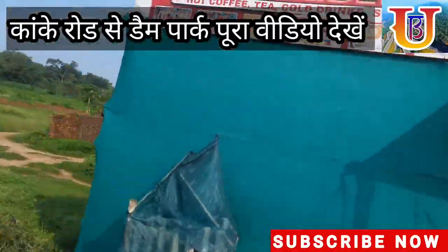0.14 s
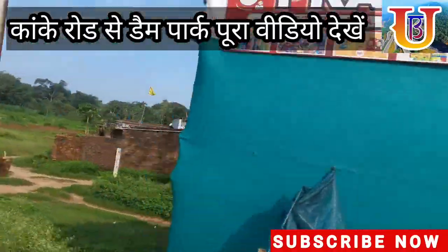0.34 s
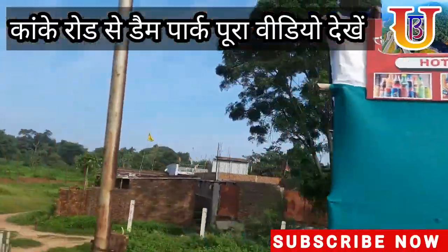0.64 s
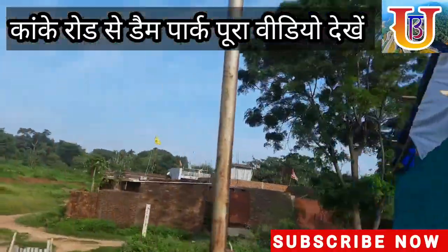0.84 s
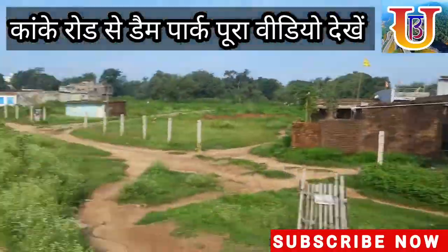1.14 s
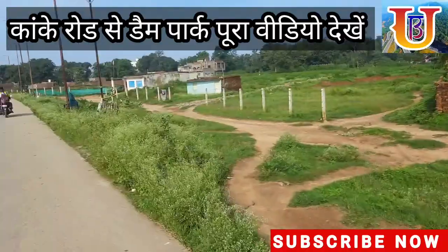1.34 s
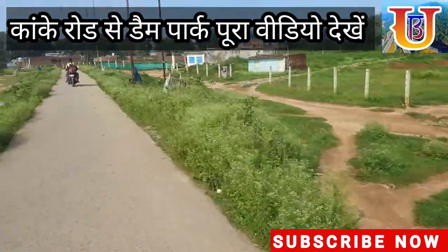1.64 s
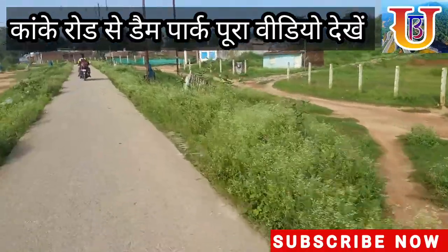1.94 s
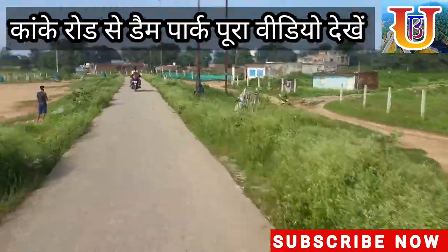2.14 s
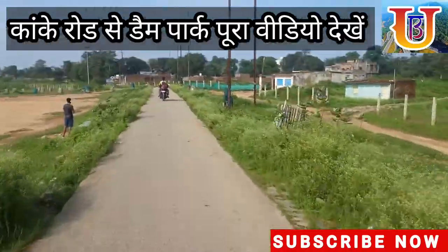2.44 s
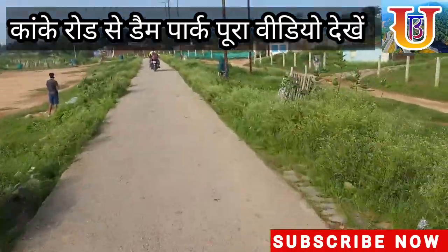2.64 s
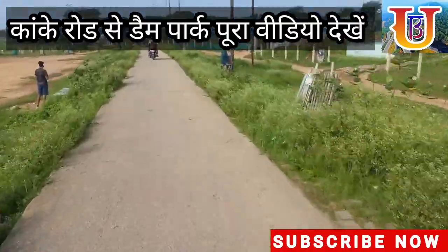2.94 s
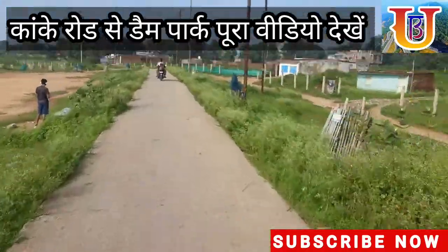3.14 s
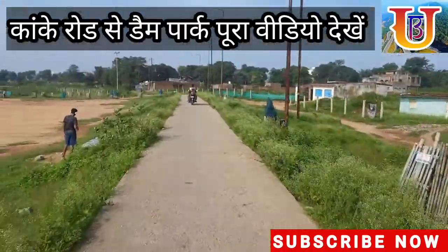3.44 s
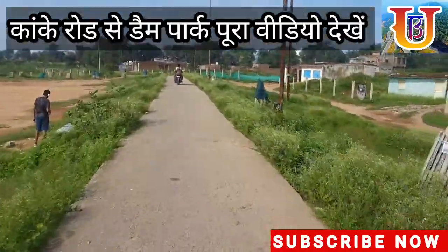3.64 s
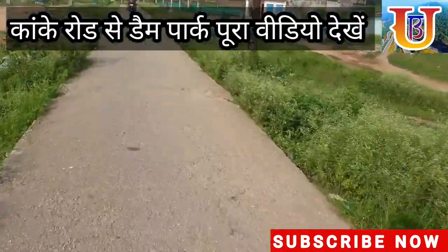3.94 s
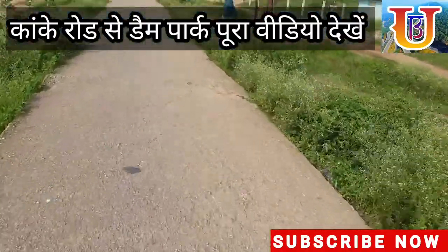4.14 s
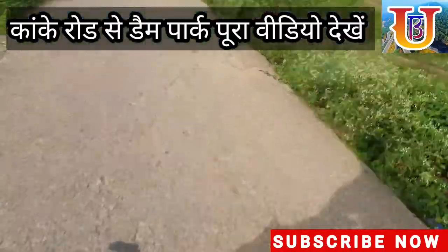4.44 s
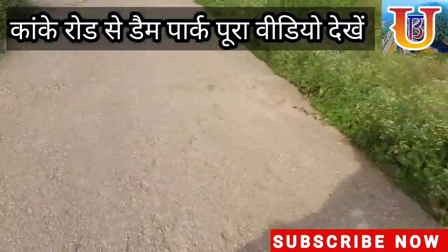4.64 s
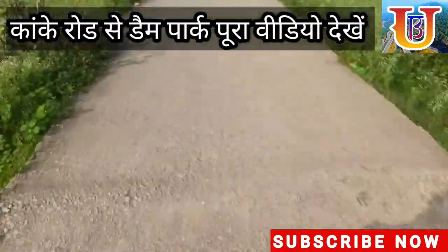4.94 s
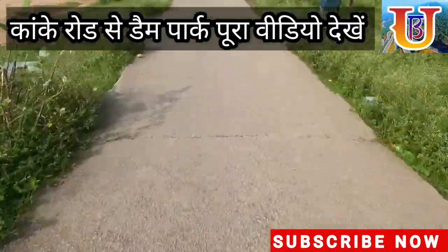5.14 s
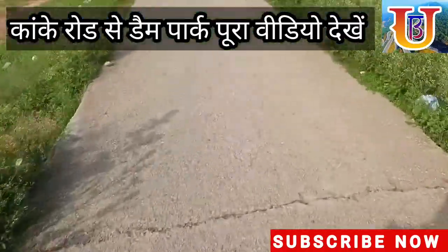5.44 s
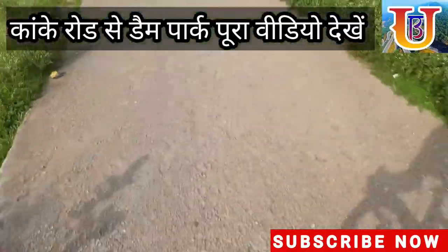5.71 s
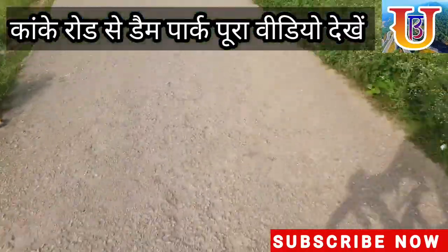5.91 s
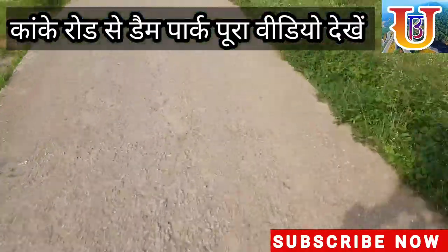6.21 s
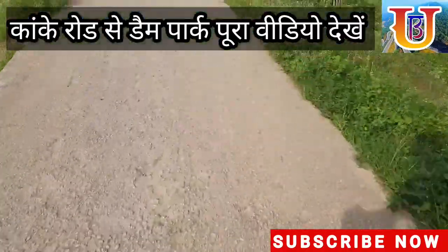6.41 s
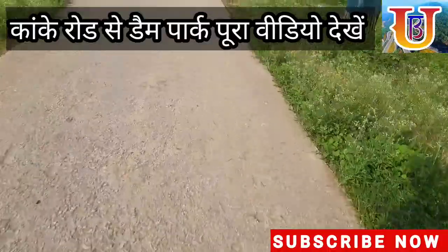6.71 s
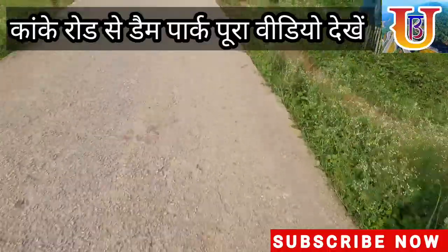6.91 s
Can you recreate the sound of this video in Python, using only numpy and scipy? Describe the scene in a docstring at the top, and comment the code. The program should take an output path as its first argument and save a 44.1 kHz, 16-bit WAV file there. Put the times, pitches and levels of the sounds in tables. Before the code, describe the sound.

A moving bicycle outdoors: fluttering wind bursts, grainy tyre rumble, increasingly busy rattles, tiny metallic pings, and a brief insect trill near the start.

```python
"""Wind buffets the microphones from the start, over droning, hissing tyres and the rattle of loose parts.
The place is a paved path; a phone rides on a bicycle and records through two microphone ports.
Wind, tyres and rattles are shaped noise; eddies and thumps are short decaying swings of air pressure.
An insect in the verge trills early on in swept chirps, a small steel part pings as a set of decaying
sines, and joints in the paving jolt the frame into bursts of noise."""
import sys
import numpy as np
from scipy import signal
from scipy.fft import rfft, irfft, next_fast_len
from scipy.io import wavfile
from scipy.ndimage import uniform_filter1d, map_coordinates

SR = 44100
rng = np.random.default_rng(int(sys.argv[2]) if len(sys.argv) > 2 else 0)


def dump(signal):
    """Clip the signal to [-1, 1] and save it as 16-bit WAV at the path in sys.argv[1]."""
    limited = np.clip(np.atleast_2d(signal).T, -1, 1)
    pcm = np.round(limited * 32767).astype(np.int16)
    wavfile.write(sys.argv[1], SR, pcm)


N = 311787


def amp(db):
    """Amplitude factor of a level in dB."""
    return 10 ** (np.asarray(db) / 20)


def unit(x):
    """x scaled to an RMS of one over both ports."""
    return x / np.sqrt(np.mean(x ** 2) + 1e-20)


def curves(rows):
    """One value per sample, by straight lines, for each column after the time."""
    time_s, *columns = np.transpose(rows)
    return [np.interp(np.arange(N) / SR, time_s, column) for column in columns]


def wobble(knots_per_s):
    """Two smooth random curves through random knots."""
    at = np.arange(N) * knots_per_s / SR
    return np.array([map_coordinates(knots, [at]) for knots in rng.standard_normal((2, 4000))])


def filtered(x, response):
    """x passed through a complex response of frequency."""
    size = next_fast_len(N + SR // 2)  # room for the filter to ring out
    return irfft(rfft(x, size) * response(np.fft.rfftfreq(size, 1 / SR)), size)[..., :N]


def colour(points):
    """Gain curve through (hz, db) points on a log frequency axis."""
    point_hz, db = np.transpose(points)
    return lambda hz: amp(np.interp(np.log(hz + 1), np.log(point_hz + 1), db))


def resonances(modes):
    """Causal sum of (hz, width_hz, gain_db) resonances with alternating signs."""
    def response(f):
        total = 0
        for k, (hz, width_hz, gain_db) in enumerate(modes):
            damping = 1j * f * width_hz
            total = total + (-1) ** k * amp(gain_db) * damping / (hz * hz - f * f + damping)
        return total
    return response


def pair(alike):
    """White noise for two ports, correlated by alike (0 to 1)."""
    a, b = rng.standard_normal((2, N))
    turn = np.arccos(np.clip(alike, 0, 1)) / 2
    return np.cos(turn) * a + np.sin(turn) * np.array([b, -b])


def sides(pan_db):
    """Left and right gains for a left-minus-right level."""
    return amp(np.array([pan_db, -pan_db]) / 2)


def patchy(x, depth_db):
    """Sound with a random gain in patches of frequency and time."""
    z = signal.stft(x, nperseg=1024)[2]
    field = uniform_filter1d(rng.standard_normal(z.shape), size=4, axis=1)
    field = uniform_filter1d(field, size=2, axis=2)
    return signal.istft(z * amp(depth_db * unit(field)), nperseg=1024)[1][:, :N]


def slide(x, pitch, centre_hz):
    """Shifts the whole spectrum so that centre_hz follows the (time_s, centre_hz) curve."""
    turn = 2 * np.pi * np.cumsum(curves(pitch)[0] - centre_hz) / SR
    return np.real(signal.hilbert(x, next_fast_len(N))[:, :N] * np.exp(1j * turn))


# wind on the ports: time_s, flutter_db, rumble_db, pan_db (left minus right)
WIND = [(0.0, -50, -48, 1), (0.27, -51.5, -39, -0.5), (0.35, -35, -43, -8), (0.39, -33, -42, -2),
        (0.53, -34.5, -42, 1), (0.71, -45, -42, 1.5), (0.79, -37, -35.5, 2), (0.85, -33, -37, 4),
        (0.89, -42, -37, -3), (0.94, -32.5, -38, 9), (0.965, -25.5, -32, 6), (0.99, -42, -43, -6),
        (1.01, -32, -32, -5), (1.04, -37, -23, 6), (1.06, -43, -34, 0), (1.09, -40, -41, -7),
        (1.12, -49, -46, 0.0), (1.25, -49, -44, -1), (1.3, -35.5, -36, 1), (1.35, -44, -41, 2),
        (1.42, -34, -35, 3.5), (1.46, -35.5, -41, 7), (1.5, -31, -37, -4), (1.54, -37.5, -34, -1),
        (1.65, -38, -43, 1), (1.74, -38.5, -41, 0.5), (1.78, -56, -40, -5), (1.85, -53, -45.5, -6),
        (1.99, -35.5, -41, 2), (2.13, -45.5, -45, 4), (2.22, -42.5, -49, -1), (2.28, -31, -26, -1.5),
        (2.32, -35, -43, 3), (2.36, -25.5, -36, 0), (2.44, -34, -36, 9), (2.46, -42, -47.5, 0),
        (2.64, -43, -42.5, -3), (2.85, -32.5, -36.5, 3), (2.87, -51, -38, -8), (2.94, -31, -47, 1),
        (2.965, -34.5, -38, 2), (2.995, -26.5, -36, 2), (3.03, -37, -48, -2), (3.06, -36, -34, 2),
        (3.11, -37.5, -37, 1), (3.145, -31.5, -38, -1), (3.19, -22.5, -35, 1), (3.22, -29.5, -25, -2),
        (3.25, -29, -32, 1), (3.275, -28, -32, 3), (3.3, -29.5, -50, 10), (3.33, -45, -40, -9),
        (3.38, -45.5, -43, 0), (3.425, -40, -46, -3), (3.475, -56, -52, 0), (3.525, -41, -37, 1),
        (3.565, -51, -51, 0), (3.605, -36, -40, 1), (3.64, -43.5, -38, -4), (3.73, -36, -44, 2),
        (3.775, -46, -43, -2), (3.825, -37.5, -38, 3), (3.86, -44, -42, 0), (3.9, -36.5, -39, -1),
        (3.98, -34.5, -40, 3), (4.08, -26, -32, -1), (4.11, -36.5, -51, -4.5), (4.25, -38, -39, 5.5),
        (4.31, -51, -53, 1), (4.37, -40.5, -42, -5), (4.47, -42.5, -47, 0), (4.5, -36.5, -40, -1),
        (4.55, -44.5, -44, 2), (4.69, -56, -51, -4), (4.77, -60, -48, 5), (5.05, -52.5, -47, -1),
        (5.16, -44.5, -43, -4), (5.18, -36, -41, -4), (5.22, -60, -48, -18), (5.26, -40, -50, 2),
        (5.3, -37, -38, -1), (5.49, -40.5, -46.5, 4), (5.61, -42.5, -33.5, -7), (5.65, -40, -58, -6),
        (5.71, -44.5, -41.5, 5.5), (6.04, -41, -44, -1), (6.06, -48, -40.5, -4), (6.22, -46, -56, 10),
        (6.28, -43, -40.5, -4), (6.42, -38.5, -43, 6), (6.46, -37.5, -41, 3), (7.07, -42.5, -41.5, 4)]
# noise colour of the low rumble and of the faster flutter: pitch_hz, gain_db (per Hz)
RUMBLE = [(12, -61), (20, -10), (75, 3.5), (119, 4), (184, -5), (260, -9), (340, -37), (570, -120)]
FLUTTER = [(76, -44), (130, -8), (341, -1.5), (386, -3.5), (437, -4), (758, -18), (858, -20.5),
           (2450, -46.5), (3500, -63), (4550, -78), (7700, -120)]
# treble gain of the flutter when it is at TREBLE_REFERENCE_DB: time_s, gain_db
TREBLE = [(0, -7.5), (1, 7), (1.8, 10.5), (2.4, -19), (3.2, 4.5), (4, 0.5), (4.6, -2.5), (5.4, -7),
          (6.2, -4), (7.07, -15)]
TREBLE_REFERENCE_DB, TREBLE_SLOPE = -18.5, -0.2  # slope: treble dB per dB of flutter
PUFFS_DB, PUFFS_PER_S = 2, 11  # quick puffs inside a gust
SIDESTEP_DB = 2  # how far the rumble wanders at each port


def wind():
    """Turbulence tears past each port on its own: lumpy rumble and faster flutter, duller when strong."""
    flutter_db, rumble_db, pan_db = curves(WIND)
    rumble_swell_db = SIDESTEP_DB * wobble(12) + 1.53 * wobble(22) + 3.25 * wobble(60)
    rumble = unit(filtered(amp(rumble_swell_db) * pair(0), colour(RUMBLE)))

    lumps = amp(8.1 * np.tanh(0.58 * wobble(60) + 0.34 * wobble(170)))  # swells of limited size
    puffs = amp(PUFFS_DB * np.tanh(wobble(PUFFS_PER_S)))
    air = lumps * puffs * patchy(pair(0), depth_db=2.5)
    body = filtered(air, colour(FLUTTER))
    treble = filtered(air, lambda hz: colour(FLUTTER)(hz) * hz ** 2 / (hz ** 2 + 700 ** 2))
    treble_db = curves(TREBLE)[0] + TREBLE_SLOPE * (flutter_db - TREBLE_REFERENCE_DB)
    flutter = (body + (amp(treble_db) - 1) * treble) / np.std(body)
    return sides(pan_db) * (amp(rumble_db) * rumble + amp(flutter_db) * flutter)


# the ride, for tyres and loose parts: time_s, hiss_db, roar_db, drone_db (tyres),
# dull_db, bright_db, thin_db (rattle)
RIDE = [(0.0, -53.5, -49, -50.5, -60, -66, -81), (0.37, -53, -53, -51, -64, -66, -72),
        (0.47, -49, -64, -48.5, -56.5, -58.5, -56), (0.61, -50, -50, -42.5, -57.5, -61, -59),
        (0.83, -49.5, -58, -61, -55.5, -58, -56), (1.16, -54, -52.5, -45, -56, -67.5, -67.5),
        (1.59, -52.5, -67, -71, -57.5, -58.5, -62), (1.79, -58, -60, -73, -82, -75, -83),
        (1.93, -57, -51.5, -61, -49.5, -49, -57), (2.01, -57, -53, -77, -70, -59.5, -66),
        (2.22, -53.5, -49, -50, -51, -58, -60), (2.56, -55.5, -58.5, -59.5, -62, -65, -71),
        (3.05, -52.5, -56, -54, -56, -59.5, -62.5), (3.68, -57, -57, -67, -65, -72, -83),
        (4.02, -48, -55, -46, -54.5, -54.5, -58), (4.35, -51, -55.5, -53, -64, -61, -64),
        (4.86, -50.5, -54.5, -50, -60, -58, -66), (4.94, -49, -57, -47.5, -57.5, -58, -66),
        (5.3, -49.5, -59, -51, -52.5, -56, -66), (5.5, -46.5, -56.5, -50.5, -52, -72, -70),
        (5.62, -50.5, -54.5, -48, -60.5, -64, -70), (5.81, -50.5, -59.5, -58, -65, -67, -70),
        (5.83, -49, -71, -51, -52.5, -58, -61), (6.03, -49, -68, -50, -55.5, -60.5, -64),
        (6.15, -47, -64, -48, -52.5, -57, -60), (6.3, -52, -61, -49, -52.5, -56.5, -65),
        (6.5, -48, -64, -55.5, -54, -59, -64), (6.77, -52, -65, -51, -51, -54, -62),
        (7.07, -54, -63, -53.5, -67, -68, -69)]
# noise colours of the tyres: pitch_hz, gain_db (per Hz)
DRONE = [(120, -120), (300, -2.5), (420, -6), (680, -0.5), (800, -14.5), (1000, -18.5), (2000, -120)]
ROAR = [(200, -120), (600, -19.5), (950, -2.5), (1150, -1.5), (1350, -2.5), (1700, -17.5), (2300, -15),
        (4000, -50), (7000, -120)]
HISS = [(1000, -4.5), (1600, -3.5), (2100, -1), (2600, -4), (3700, -6), (5000, -6.5), (6200, -7.5),
        (7700, -8.5), (8600, -14.5), (11200, -19), (15300, -15), (15900, -30), (16500, -50)]
# the roar slides in pitch: time_s, centre_hz
ROAR_PITCH = [(0, 1104), (1.199, 1133), (1.8, 961.5), (2.4, 1047), (3.4, 1142), (4.6, 1304), (5.299, 1261),
              (7.07, 1205)]
ROAR_CENTRE_HZ = 1150  # before the slide


def tyres():
    """Tread on rough paving: a drone, a roar above it and a grainy hiss."""
    hiss_db, roar_db, drone_db = curves(RIDE)[:3]
    drone_swell = amp(4.6 * np.tanh(wobble(40)[0]))
    drone = unit(drone_swell * filtered(pair(0.92), colour(DRONE)))
    roar_swell = amp(4.8 * np.tanh(wobble(45)[0]))
    roar = unit(roar_swell * filtered(pair(1.0), colour(ROAR)))
    roar = slide(roar, ROAR_PITCH, ROAR_CENTRE_HZ)
    grain = amp(0.34 * wobble(5.8)[0] + 1.1 * wobble(60)[0] + 2.15 * wobble(250)[0])
    hiss = unit(grain * filtered(patchy(pair(0.029), depth_db=4.0), colour(HISS)))
    return amp(hiss_db) * hiss + amp(drone_db) * drone + amp(roar_db) * roar


# resonances of the rattling parts: pitch_hz, width_hz, gain_db
DULL = [(1430, 1100, 6), (1795, 138, 28), (2870, 440, -5), (2373, 213, 14.5)]
CLINK = [(3250, 790, 0), (4310, 250, 7), (6840, 520, 6)]
BRIGHT = [(4885, 520, 4.5), (5230, 690, 2.5), (7200, 1300, -9.5)]
THIN = [(9900, 2300, -19), (13500, 1900, -15), (15320, 310, -2.5)]
# the clearest rattles: time_s, level_db, then dull_db, bright_db, thin_db (relative to level_db)
KNOCKS = [(0.011, -30, -4, -8, -9), (0.024, -34, -5, -6, -24), (0.145, -33.5, -6, -7, -10),
          (0.186, -33, -6, -7, -14), (0.2568, -27, -8, -8.5, -15), (0.432, -48, -9, -17, -22),
          (0.4485, -39, -10, -18, -17), (0.46, -27.5, -5, -7.5, -14), (0.486, -29, 0, -17, -18),
          (0.514, -26.5, -16, -6, -13), (0.536, -30, -16, -8, -6), (0.563, -29, -29, -2, -13),
          (0.596, -40, -10, -14, -16), (0.672, -34, -21, -2, -11), (0.694, -35, -17, -8, -4),
          (0.745, -39, -16, -18, -3), (0.7834, -23.5, -7, -5, -11), (0.806, -33, -14, -4, -6),
          (0.8305, -23, -10, -5.5, -13), (1.0916, -25, -2, -9, -14), (1.302, -32, -8, -6.5, -22),
          (1.368, -33, 5, -22, -26), (1.4078, -26, 2, -12, -20), (1.435, -33, -14, -7.5, -8),
          (1.513, -34, 1, -11, -20), (1.606, -38, -12, -4, -18), (1.852, -36, -18, -6, -12),
          (1.886, -31, -7, -2, -14), (1.914, -32, -3, -17, -22), (1.929, -27, -6.5, -14, -19),
          (1.957, -28, -9, -15, -23), (2.026, -33, -8, -7, -20), (2.104, -31.5, -5, -4, -20),
          (2.147, -31.5, -2, -10, -17), (2.169, -34, -6, -6, -16), (2.214, -32, -4, -5, -22),
          (2.262, -34, -8, -6, -20), (2.288, -52, -11, -15, -24), (2.3126, -34, -1, -32, -31),
          (2.3525, -29, -4, -12, -30), (2.4144, -36, -14, -11, -28), (2.518, -43, -4, -14, -26),
          (2.615, -31.5, 3.5, -12, -26), (2.6652, -27.5, -9, -7.5, -18), (2.712, -45, -13, -12, -26),
          (2.796, -34, -10, -6, -12), (2.853, -40, -8, -12, -18), (2.889, -32, -1, -11, -22),
          (2.994, -32, -11, -6, -25), (3.019, -31.5, -5, -3, -20), (3.104, -27, -7, -11, -20),
          (3.139, -50, -11, -16, -26), (3.225, -31, -15, -4, -11), (3.338, -32, 0, -11, -29),
          (3.455, -42, 3, -18, -22), (3.518, -41, 1, -23, -16), (3.537, -38, 0, -20, -28),
          (3.568, -38, 0, -20, -28), (3.743, -28, 1, -10.5, -18), (3.93, -40, -8, -6, -23),
          (3.985, -31, -28, 0, -9), (4.101, -34, -14, -8, -24), (4.121, -32, -23, -4, -31),
          (4.165, -34, -14, -2, -22), (4.189, -32, -16, 1, -22), (4.282, -30, -8, -10, -6),
          (4.3281, -31, -24, -2.5, -9), (4.39, -46, -17, -9, -22), (4.4746, -24, -13, -5, -9),
          (4.535, -35, -3, -7, -31), (4.593, -36.5, -1, -14, -26), (4.65, -46, -20, -5, -22),
          (4.715, -41, -12, -4, -22), (4.731, -32, 0, -16, -24), (4.7722, -22, -10, -11, -20),
          (4.794, -44, -11, -9, -22), (4.825, -38, 0, -17, -24), (4.879, -35, -16, -3, -22),
          (4.926, -33, -4, -18, -15), (4.952, -29, -32, -2, -27), (4.9976, -21, -3, -2, -29),
          (5.104, -28, -20, -4.5, -17), (5.159, -40, -23, -1, -25), (5.183, -29.5, -20, -8, -29),
          (5.2078, -28, -13, -3, -10), (5.252, -23.5, -3.5, -10, -13), (5.2828, -24, -2.5, -8.5, -30),
          (5.3283, -38, -3, -18, -28), (5.351, -48, -9, -18, -28), (5.368, -40, -2, -14, -28),
          (5.4, -34, -2, -16, -28), (5.443, -38, -1, -19, -28), (5.46, -34, 0, -18, -28),
          (5.476, -27, 0, -9, -13), (5.493, -31, -3, -7, -20), (5.505, -30, 2, -12, -24),
          (5.517, -28, 0.5, -10, -24), (5.55, -32, 0, -18, -28), (5.567, -38, -3, -6, -24),
          (5.603, -41, -2, -17, -26), (5.684, -25, -4, -10.5, -18), (5.71, -33, -1, -8, -24),
          (5.8346, -41, -8, -19, -24), (5.848, -28, -12, -3, -22), (5.886, -27, -5, -8, -25),
          (5.909, -23, -4, -8.5, -21), (5.94, -35, -1, -12, -26), (5.9694, -27, -7, -13, -28),
          (6.0612, -20.5, -2.5, -10, -35), (6.097, -31, 2, -8, -26), (6.139, -33, -14, -6, -20),
          (6.165, -43, -6, -12, -26), (6.2071, -25.5, 1, -8, -22), (6.2353, -22.5, -17, -8, -12),
          (6.258, -34, -16, 0, -22), (6.3026, -38, 1, -22, -23), (6.3472, -29, -2.5, -10, -29),
          (6.361, -29, 4, -8, -26), (6.38, -33, 1, -16, -26), (6.404, -27, 1, -29, -33),
          (6.4404, -31, -20, -6, -15), (6.494, -33, 0.5, -0.5, -27), (6.506, -31, -4, -2, -24),
          (6.535, -31, -14, -6, -22), (6.558, -44, -9, -11, -23), (6.596, -29, -1, -17, -25),
          (6.613, -31, -1, -9, -24), (6.6386, -31, 2, -27, -35), (6.6712, -54, -12, -21, -25),
          (6.703, -36, -9, -20, -28), (6.769, -40, -6, -14, -26), (6.793, -30, -14, -19, -8),
          (6.819, -35, -12, -7, -22), (6.899, -28, -5, -7, -33), (6.9863, -30.5, -9, -8.5, -16)]
# the dull rattle slides in pitch: time_s, centre_hz
DULL_PITCH = [(0, 1900), (1.2, 1850), (2.199, 1900), (3.599, 1880), (4.601, 1820), (5.302, 1790),
              (7.07, 1790)]
DULL_CENTRE_HZ = 1800  # before the slide
CLUMP_DB, CLUMPS_PER_S = 1.0, 40  # the chatter comes in clumps
CHATTER_CLINK_DB = -7.5  # clink over the bright rattle
KNOCK_CLINK_DB, KNOCK_SCATTER_DB = -2.5, 3.5  # clink over a knock's bright part, and its scatter
STRIKE_DB = -11  # the sharp blow that opens each contact, over its puff of noise


def rattle():
    """Loose parts chatter: each contact, a blow and a puff of noise a few ms long, excites resonances."""
    at = rng.integers(0, N, 2000)  # contacts at random samples
    # each contact favours its own parts
    size_db = rng.uniform(0, 6.3, (len(at), 1)) + rng.uniform(0, 5.7, (len(at), 4))
    size_db = size_db + CLUMP_DB * wobble(CLUMPS_PER_S)[0][at, None]
    dull_db, bright_db, thin_db = curves(RIDE)[3:]
    chatter_dbs = (dull_db, bright_db + CHATTER_CLINK_DB, bright_db, thin_db)

    time_s, level_db, dull, bright, thin = np.transpose(KNOCKS)
    knock_at = np.round(time_s * SR).astype(int)
    clink = bright + KNOCK_CLINK_DB + KNOCK_SCATTER_DB * rng.standard_normal(len(knock_at))
    knock_dbs = (level_db + dull, level_db + clink, level_db + bright, level_db + thin)

    t60s, alikes = (0.014, 0.014, 0.016, 0.015), (0.95, 0.2, 0.28, 0.14)  # seconds; port likeness
    t = np.arange(SR // 10) / SR
    parts = []
    for k, modes in enumerate((DULL, CLINK, BRIGHT, THIN)):
        puff = amp(-60 * t / t60s[k]) * (1 - np.exp(-t / 0.0012))
        puff_size = np.linalg.norm(puff)
        noise = patchy(pair(alikes[k]), depth_db=1.5)
        scale = np.std(filtered(noise, resonances(modes)))
        chatter = np.bincount(at, amp(size_db[:, k]), N)
        chatter = chatter / np.std(chatter) / puff_size
        blows = amp(chatter_dbs[k]) * chatter + np.bincount(knock_at, amp(knock_dbs[k]), N)
        puffs = signal.fftconvolve(blows, puff)[:N] * noise
        drive = puffs + amp(STRIKE_DB) * puff_size * blows
        parts.append(filtered(drive, resonances(modes)) / scale)
    return slide(parts[0], DULL_PITCH, DULL_CENTRE_HZ) + sum(parts[1:])


# insect phrases, before each stroke's own sweep and unevenness:
# start_s, end_s, first_hz, last_hz, level_db
TRILL = [(0.231, 0.335, 6200, 6330, -55), (0.39, 0.475, 6300, 6450, -60), (0.547, 0.673, 6160, 6660, -57),
         (0.738, 0.797, 6400, 6600, -65), (0.82, 0.92, 5850, 6000, -52), (0.95, 1.08, 5830, 6300, -51.5),
         (1.106, 1.23, 5950, 6240, -50.5), (1.243, 1.359, 6000, 6240, -51)]


def insect():
    """In the verge, a little to the right: each phrase is a train of upward chirps that swells and climbs."""
    out, t = np.zeros(N), np.arange(N) / SR
    # no two strokes are alike
    drift_hz, uneven_db = [[60], [3.5]] * wobble(70) + [[40], [1.3]] * wobble(21)
    slip = 0.2 * wobble(25.0)[0]  # strokes ahead of or behind the beat
    for start_s, end_s, first_hz, last_hz, level_db in TRILL:
        progress = np.clip((t - start_s) / (end_s - start_s), 0, 1)
        stroke = ((t - start_s) * 88.0 + slip) % 1  # 88 strokes a second on average
        hz = first_hz + (last_hz - first_hz) * np.sqrt(progress) + 700 * (stroke - 0.3) + drift_hz
        gate = np.sin(np.pi * stroke) ** 2 * (t > start_s) * (t < end_s)
        swell_db = level_db + uneven_db - 9.7 * (progress - 0.8) ** 2
        out += amp(swell_db) * gate * np.sin(2 * np.pi * np.cumsum(hz) / SR)
    return out * sides(-2.5)[:, None]


# low thumps, a slug of air pushing on the ports: time_s, peak_db (before pan), pitch_hz, pan_db
THUMPS = [(0.237, -39, 88.5, -6), (0.498, -35, 67, 12), (0.762, -36, 99, 19), (0.867, -31, 115, 19),
          (1.018, -26, 94, 11), (1.427, -24, 124, 5), (1.599, -31, 120, -7), (1.968, -33.5, 100, -2),
          (2.262, -27, 131, -3), (2.42, -31, 103, 6), (2.761, -34, 128, 2), (2.824, -34, 113.4, -5),
          (2.956, -35, 54.7, -0.5), (3.051, -30.5, 135, 2), (3.183, -29, 93.6, 6), (3.596, -31, 107, -2),
          (3.722, -33, 105, 8), (3.901, -35, 94, 3), (4.051, -36, 117, 8), (4.6, -42, 125, 7),
          (5.286, -34, 127.3, 2), (5.586, -35, 87, 6), (6.268, -45, 67, -3.5), (6.59, -34, 92, 1.0),
          (6.765, -38, 157, 10)]
# single strong eddies: time_s, peak_db (before pan), pitch_hz, pan_db
EDDIES = [(0.302, -30.5, 248, 4), (0.343, -38, 450, 14), (0.35, -18.5, 350, -2), (0.512, -22.5, 215, 0),
          (0.869, -22.5, 298, -5), (0.894, -24, 308, 9), (0.921, -24, 340, -2.5),
          (0.948, -19.5, 460, -16.5), (0.955, -22, 570, -4), (1.004, -25.5, 422, -12),
          (1.0125, -25.5, 560, -12), (1.06, -29, 515, 4), (1.068, -29, 620, 2), (1.077, -23.5, 656, -2),
          (1.085, -28.5, 704, -4), (1.292, -31, 444, -9), (1.446, -22.5, 423, 0), (1.477, -22, 348, -1.0),
          (1.498, -23.5, 328, 6), (1.514, -22.5, 480, 0), (1.589, -38, 413, 13), (1.642, -43, 396, 4),
          (1.793, -34, 363, 5), (1.929, -24, 290, -2), (1.932, -26, 626, 0), (1.977, -21.5, 293, -2),
          (1.994, -17.5, 302, 1), (2.272, -22, 375, 4), (2.308, -32, 347, 6), (2.351, -19, 228, -2),
          (2.353, -25, 620, 0), (2.383, -18, 264, 3), (2.398, -34, 277, 0), (2.426, -20, 336, -1),
          (2.705, -27.5, 288, 3), (2.769, -30, 428, 4), (2.921, -26.5, 408, -0.5), (2.942, -22, 337, 6),
          (3.057, -24.5, 380, -8), (3.125, -20.5, 363, -9), (3.163, -15.5, 435, -4), (3.177, -17.5, 292, 5),
          (3.192, -10, 261, -1), (3.204, -20, 327, 2), (3.24, -23, 332, 4), (3.255, -22, 367, 0),
          (3.294, -22, 426, 13.5), (3.422, -22.5, 251.3, 1), (3.597, -25, 287, 6), (3.673, -25.5, 327, -4),
          (3.711, -25, 340, -1), (3.73, -19.5, 294, 4), (3.821, -24.5, 454, 2), (3.882, -19.5, 410, 5.5),
          (3.931, -27.5, 419, -1), (3.965, -33, 357, 6), (3.984, -16, 369, 2), (4.055, -25, 414, 5),
          (4.082, -18, 398, -7), (4.166, -32.5, 369, -14), (4.368, -31, 274, -13), (4.407, -21.5, 264, 1),
          (4.487, -29, 460, -9), (4.515, -33, 333, -9), (4.612, -36, 189, 1), (4.788, -34.5, 333, -12),
          (5.173, -24.5, 356, 9), (5.286, -27, 301.2, 3), (5.563, -27, 350, -7), (5.806, -24.5, 262.6, 3),
          (6.02, -30, 398, 0), (6.064, -26.5, 590, 4), (6.288, -21, 320, -2), (6.466, -18, 321, -1),
          (6.584, -26, 285, -3), (6.62, -23.5, 375, -9.5), (6.774, -27, 317, -4)]
THUMP_RISE_S, EDDY_RISE_S = 0.011, 0.0024


def eddies(rows, rise_s, edge):
    """A strong eddy strikes both diaphragms, out of step, and swings out in a few cycles."""
    out, t = np.zeros((2, N + SR)), np.arange(SR // 8) / SR
    turns = rng.uniform(0, np.pi, (len(rows), 2))  # starting phase at each port
    for (time_s, peak_db, hz, pan_db), turn in zip(rows, turns):
        swing = 2 * np.pi * hz * t + turn[:, None]
        snap = edge * np.exp(-t * hz / 0.85) * np.sin(1.98 * swing)  # a brighter edge at the start
        push = (1 - np.exp(-t / rise_s)) * np.exp(-t * hz / 1.26) * (np.sin(swing) + snap)
        push = push / np.abs(push).max()
        out[:, round(time_s * SR):][:, :len(t)] += amp(peak_db) * sides(pan_db)[:, None] * push
    return out[:, :N]


# partials of the steel part, before the spread between blows:
# pitch_hz, t60_s, lead_rad (left ahead of right), pan_db
STEEL = [(5260, 0.08, 1, -1), (8875, 0.11, 2.07, -6.5), (13155, 0.13, 2.2, -1), (13010, 0.07, 2.1, 0),
         (13960, 0.03, 2.2, 0)]
# pings: time_s, level_db (upper pair), low_db, middle_db (both relative to level_db)
PINGS = [(0.4494, -41, -13, -17), (0.6725, -36, -11, -19), (0.9734, -39.5, -6, -15),
         (1.6338, -30, -16, -19), (1.9565, -33.5, -9, -20), (2.3913, -49, -4, -6.5),
         (3.5176, -39, -6.5, -14), (4.035, -46, -9, -14), (4.3268, -37, -2, -5), (4.634, -40, -4, -3),
         (4.9503, -26, 4.5, -17), (4.998, -24.5, 2, -12), (5.104, -33.5, -6, -7), (5.2884, -33.5, -13, -8),
         (5.493, -28.5, -11.5, -7.5), (5.632, -38, -14, -6.5), (5.885, -27.5, -7, -13),
         (6.159, -42, -2, -6), (6.283, -44, -8, -15.5), (6.3788, -28, -14, -18)]
# spread from blow to blow: share of pitch, log share of decay rate, left-right phase in radians
PING_DETUNE, PING_DAMPING, PING_SWAY = 0.0013, 0.2, 0.25


def pings():
    """A small steel part is struck: three partials, the top one a beating pair with a brief one above."""
    out, t = np.zeros((2, N + SR)), np.arange(SR // 4) / SR
    spreads = rng.standard_normal((len(PINGS), 3, len(STEEL)))
    for (time_s, level_db, low_db, middle_db), spread in zip(PINGS, spreads):
        ring = np.zeros((2, len(t)))
        partial_dbs = (low_db, middle_db, 0, -6.5, -9)
        for (hz, t60_s, lead_rad, pan_db), partial_db, (sway, detune, damp) in zip(
                STEEL, partial_dbs, spread.T):
            decay = amp(partial_db - 60 * t / t60_s * np.exp(PING_DAMPING * damp))
            phase = np.array([[0.5], [-0.5]]) * (lead_rad + PING_SWAY * sway)
            tone = np.sin(2 * np.pi * hz * (1 + PING_DETUNE * detune) * t + phase)
            ring += decay * sides(pan_db)[:, None] * tone
        onset = 1 - np.exp(-t / 0.00029)
        crack = 0.58 * amp(-60 * t / 0.0095) * rng.standard_normal((2, len(t)))
        out[:, round(time_s * SR):][:, :len(t)] += amp(level_db) * (ring * onset + crack)
    return out[:, :N]


# the wheel hits a joint in the paving: time_s, level_db
BUMPS = [(1.929, -32), (2.352, -33.5), (5.182, -50), (6.059, -26)]
# noise colour of the shuddering frame: pitch_hz, gain_db (per Hz)
FRAME = [(300, 3.5), (600, 7), (1100, -4), (2500, -10.5), (5000, -17), (9000, -37)]


def bumps():
    """The whole frame shudders: a broad crack of noise that dies within about a tenth of a second."""
    time_s, level_db = np.transpose(BUMPS)
    t = np.arange(SR // 10) / SR
    hits = np.bincount(np.round(time_s * SR).astype(int), amp(level_db), N)
    shudder = signal.fftconvolve(hits, amp(-60 * t / 0.11))[:N]
    return shudder * unit(filtered(pair(0.19), colour(FRAME)))


# the phone turns, so the bicycle reaches the left port earlier by: time_s, lead_ms
LEAD = [(0, 0.37), (1, 0.34), (1.8, 0.093), (2.5, 0.12), (3.2, 0.095), (3.9, 0.18), (4.3, 0.24),
        (4.6, 0.095), (5.2, 0.066), (6, 0.055), (7.07, 0.057)]


def ports(x):
    """The right microphone port hears the bicycle a little later than the left."""
    late = np.arange(N) - curves(LEAD)[0] * SR / 1000
    return np.array([x[0], map_coordinates(x[1], [late], order=5, mode="nearest")])


def scene():
    """Air on the ports, the bicycle heard through them, the steel part and the insect."""
    thumps = eddies(THUMPS, THUMP_RISE_S, edge=0.63)
    air = wind() + thumps + eddies(EDDIES, EDDY_RISE_S, edge=0.72)
    bicycle = ports(tyres() + rattle() + bumps())
    return air + bicycle + insect() + pings()


TOP_HZ = 16600  # band limit
FADE_HZ, FADE_DB = 15300, -14  # middle and depth of the microphone's treble fade


def record(dry):
    """The phone fades at the very top and keeps nothing above its band limit."""
    def response(hz):
        return (hz < TOP_HZ) * amp(FADE_DB / (1 + np.exp((FADE_HZ - hz) / 80)))
    return filtered(dry, response)


dry = scene()
out = record(dry)
dump(out)
```